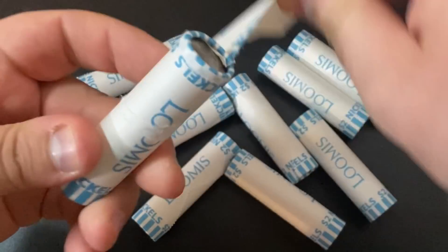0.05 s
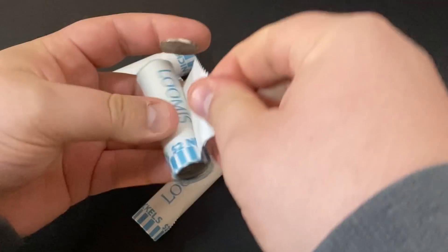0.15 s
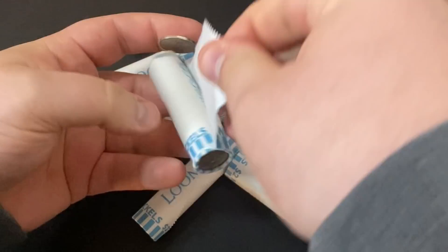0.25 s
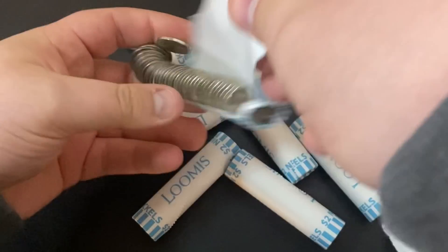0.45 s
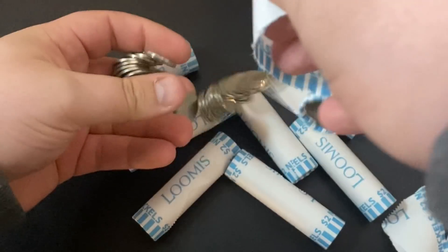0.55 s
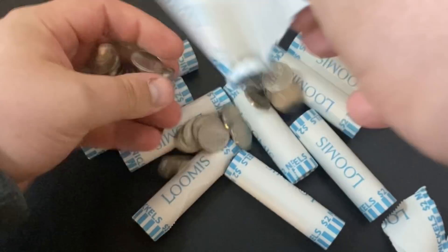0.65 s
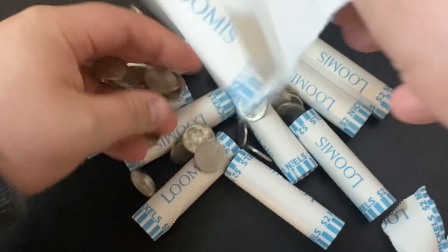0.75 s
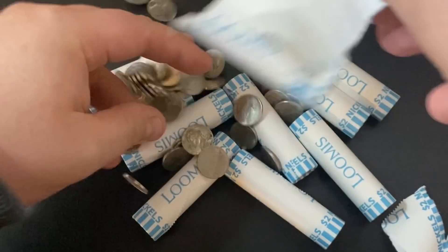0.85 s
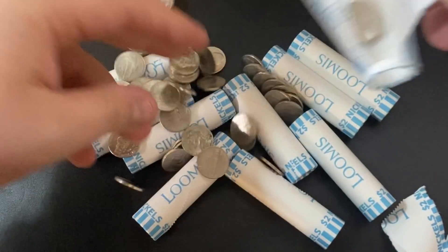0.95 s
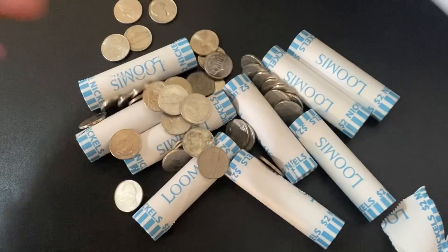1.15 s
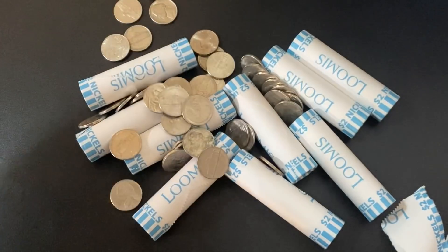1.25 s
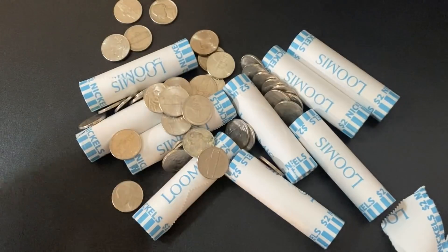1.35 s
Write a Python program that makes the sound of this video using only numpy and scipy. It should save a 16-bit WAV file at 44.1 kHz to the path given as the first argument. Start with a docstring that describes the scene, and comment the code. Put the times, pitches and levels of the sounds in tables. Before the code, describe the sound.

A paper coin roll is torn open and its coins spill onto a hard table. Small snaps lead into a crackling rip from 0.1 to 0.4 s; the wrapper slides and flicks free near 0.5 s. Bright, dense coin chatter and clinks burst out, with hard knocks from 0.64 to 0.75 s, then scattered tumbling and jingling until 1.2 s. Close, small room, faint low hum and handling rumble.

```python
"""Over room air, handling rumble and a wavering low hum that swells later, a paper coin roll is ripped open.
Paper snaps and tears (random ticks, short pitched grains, flap resonances), slides and flicks free (noise).
The coins then chatter, jingle, clink and clack (ticks, decaying sines, noise bursts), and knock, tumble and
rattle on a hard table (damped modes, noise thuds). Paper, coins and table each get a small room's tail."""
import sys
import numpy as np
from scipy import signal
from scipy.fft import rfft, irfft
from scipy.io import wavfile
from scipy.ndimage import map_coordinates

SR = 44100
rng = np.random.default_rng(int(sys.argv[2]) if len(sys.argv) > 2 else 0)


def to_wav(s):
    """Save 16-bit WAV."""
    ch = np.atleast_2d(s).T  # columns
    pcm = np.round(np.clip(ch, -1, 1) * 32767)  # PCM
    wavfile.write(sys.argv[1], SR, pcm.astype(np.int16))


N = 61739


def amp(db):
    """Decibels to gain."""
    return 10 ** (np.asarray(db) / 20)


def unit(x):
    """Scale to rms 1."""
    return x / np.sqrt(np.mean(x ** 2) + 1e-20)


def along(points, hz):
    """Read (Hz, value) points on a log frequency axis."""
    point_hz, value = np.transpose(points)
    return np.interp(np.log(hz + 1), np.log(point_hz + 1), value)


def level(rows):
    """Gain per sample from (s, dB) rows; -120 dB outside, but a last row near the end is held."""
    s, db = np.transpose(rows)
    after_db = db[-1] if s[-1] > N / SR - .1 else -120
    return amp(np.interp(np.arange(N) / SR, s, db, left=-120, right=after_db))


def colour(x, points, tilt_db_per_oct=0, size=2048):
    """Minimum-phase filter of unit energy with the given spectrum and tilt."""
    hz = np.fft.rfftfreq(size, 1 / SR)
    spectrum_db = along(points, hz) + tilt_db_per_oct * np.log2(hz + 100)
    # folding the cepstrum makes the filter causal
    cepstrum = irfft(np.log(amp(spectrum_db)))
    cepstrum[1:size // 2] *= 2
    cepstrum[size // 2 + 1:] = 0
    h = irfft(np.exp(rfft(cepstrum)))
    return signal.fftconvolve(x, h / np.linalg.norm(h))[:len(x)]


def noise(points):
    """Steady noise of rms 1 with the given spectrum."""
    gain = amp(along(points, np.fft.rfftfreq(2 * N, 1 / SR)))
    return unit(irfft(rfft(rng.standard_normal(2 * N)) * gain)[:N])


def fade(t60_s):
    """Exponential decay, cut after a third of a second."""
    return np.exp(-np.log(1000) * np.arange(SR // 3) / SR / t60_s)


def strike(x):
    """Scale a hit to rms 1 over its first 6 ms."""
    return x / np.sqrt(np.mean(x[:SR * 6 // 1000] ** 2))


def burst(points, t60_s, tilt_db_per_oct=0):
    """Decaying white noise, filtered to a spectrum: a short crack."""
    env = fade(t60_s)
    return strike(colour(env * rng.standard_normal(len(env)), points, tilt_db_per_oct))


def ring(modes, t60_s):
    """Damped (Hz, dB) modes, each strike varying their level, sign and tuning."""
    env = fade(t60_s)
    t = np.arange(len(env)) / SR
    out = np.zeros(len(env))
    for hz, db in modes:
        gain = amp(db + 2 * rng.normal()) * rng.choice([-1, 1])
        out += gain * np.sin(2 * np.pi * (hz + 15 * rng.normal()) * t)
    return strike(env * out)


def ticks(per_s, spread_db):
    """Random impulses of uneven size and sign, rms 1."""
    hit = rng.random(N) < per_s / SR
    size = amp(spread_db * np.clip(rng.standard_normal(N), -2, 2))
    return unit(hit * rng.choice([-1, 1], N) * size)


def add(track, s, x):
    """Mix a sound in at a time."""
    part = track[max(0, round(s * SR)):][:len(x)]
    part += x[:len(part)]


# Hum level. Each row: time in seconds, level in dB before the waver.
HUM = [(0, -72), (.14, -64.5), (.45, -78), (.6, -55), (.79, -53), (.86, -49), (1.02, -47), (1.4, -50)]
HUM_HZ, HUM_WAVER_DB, HUM_WAVER_RAD = 53, 2.2, .6


def waver(per_s):
    """Smooth random curve through normal draws at the given rate."""
    return map_coordinates(rng.standard_normal(200), [np.arange(N) / SR * per_s], mode="wrap")


def hum():
    """A low sine whose phase and level wander."""
    phase = 2 * np.pi * HUM_HZ * np.arange(N) / SR + HUM_WAVER_RAD * waver(12)
    return np.sqrt(2) * np.sin(phase) * amp(HUM_WAVER_DB * waver(20)) * level(HUM)


# Handling level. Each row: time in seconds, level in dB.
HANDLING = [(0, -78.5), (.2, -58.5), (.48, -53.5), (.56, -48), (.85, -54.5), (1.3, -67)]
# Handling spectrum. Each row: frequency in Hz, relative level in dB.
HANDLING_COLOUR = [(25, 0.5), (60, 5.5), (120, -5.5), (180, -10.5), (290, -6), (600, -15), (2000, -55)]


def handling():
    """Rumble of the hands: low-frequency noise."""
    return noise(HANDLING_COLOUR) * level(HANDLING)


# Room air spectrum. Each row: frequency in Hz, relative level in dB.
AIR = [(150, -6.5), (300, -27.5), (900, -7.5), (1800, -20.5), (4000, -25), (15000, -29.5)]
AIR_DB = -69.5


def room_air():
    """Still room air: steady noise."""
    return amp(AIR_DB) * noise(AIR)


# Single snaps of the paper. Each row: start in seconds, level in dB, nominal pitch of the sheet in Hz.
SNAPS = [(.003, -61, 1390), (.0695, -63, 1466), (0.094, -49, 1340), (.106, -46.5, 1060),
         (.1385, -44.5, 7200), (0.2477, -43.5, 1393), (.257, -48, 1357), (0.2832, -46.5, 1256)]
# Spectrum of torn paper. Each row: frequency in Hz, relative level in dB.
RIP_COLOUR = [(150, -18), (500, -1), (800, -8), (1350, 1.5), (1700, -13), (3160, -9), (4560, -13.5),
              (7410, -6), (15500, -13.5)]


def snaps():
    """Each snap is a noise crack plus one damped sheet mode."""
    out = np.zeros(N)
    for s, db, hz in SNAPS:
        crack = burst(RIP_COLOUR, t60_s=.041)
        sheet = ring([(hz, 0)], t60_s=.04)
        add(out, s, amp(db) * (crack + amp(-2) * sheet))
    return out


# Pull on the tearing paper. Each row: time in seconds, level in dB.
RIP = [(.091, -87), (.094, -59), (.116, -54), (.14, -43.5), (.162, -51), (.174, -45.5), (.228, -46.5),
       (.248, -46), (.272, -50.5), (.308, -46), (.328, -58), (.38, -54.5), (.41, -78)]
FIBRES_PER_S, FIBRE_SPREAD_DB = 5000, 4.5


def tear():
    """Fibres snap along the tear: dense coloured impulses that follow the pull."""
    return colour(ticks(FIBRES_PER_S, FIBRE_SPREAD_DB) * level(RIP), RIP_COLOUR)


CRACKLE_PER_S, CRACKLE_BAND_HZ, CRACKLE_DB = 1000, (1200, 13000), -2
CRACKLE_CYCLES = 3.5  # cycles to decay to 1/e


def crackle():
    """Larger fibre bundles part along the tear, each a damped sine of its own pitch."""
    out, pull = np.zeros(N), level(RIP)
    t = np.arange(SR // 100) / SR
    lo_hz, hi_hz = CRACKLE_BAND_HZ
    for when, pitch, size in rng.random((CRACKLE_PER_S * N // SR, 3)):
        hz = lo_hz * (hi_hz / lo_hz) ** np.sqrt(pitch)
        grain = np.sin(2 * np.pi * hz * t) * np.exp(-hz * t / CRACKLE_CYCLES)
        add(out, when * N / SR, pull[int(when * N)] * 2 * size * grain)
    return amp(CRACKLE_DB) * out


# Resonances of the loose flap, shifting as it grows.
# Each row: start in seconds, length in seconds, frequency in Hz, peak level in dB over the pull.
FLAP = [(0.137, 0.083, 7250, -6.5), (0.161, 0.051, 3050, -9.5), (0.204, .12, 5340, -7.5),
        (0.229, 0.088, 1300, -6.5)]
FLAP_WIDTH_HZ = 220


def flap():
    """Fibre ticks excite narrow resonances of the flap, each swelling and fading as a half sine."""
    out, t = np.zeros(N), np.arange(N) / SR
    for s, length_s, hz, db in FLAP:
        b, a = signal.iirpeak(hz, hz / FLAP_WIDTH_HZ, SR)
        band = unit(signal.lfilter(b, a, ticks(FIBRES_PER_S, FIBRE_SPREAD_DB)))
        swell = np.sin(np.pi * np.clip((t - s) / length_s, 0, 1))
        out += amp(db) * band * swell
    return out * level(RIP)


# Wrapper sliding off the coins. Each row: time in seconds, level in dB.
SLIDE = [(.37, -69.5), (.405, -43.5), (.44, -44), (.475, -46), (.503, -58), (.53, -102)]
# Slide spectrum. Each row: frequency in Hz, relative level in dB.
SLIDE_COLOUR = [(150, 0), (800, -8.5), (1450, 1), (2310, -10), (3410, 4.5), (4000, -6.5), (4600, -1),
                (7700, 1.5), (15500, -11)]


def slide():
    """The wrapper rubs over the coins: dense coloured impulses."""
    return colour(ticks(per_s=7600, spread_db=4) * level(SLIDE), SLIDE_COLOUR)


# Wrapper flicking free. Each row: start in seconds, level in dB.
FLICKS = [(0.5082, -33), (0.513, -41.5), (0.519, -39.5)]
# Flick spectrum. Each row: frequency in Hz, relative level in dB.
FLICK_COLOUR = [(80, -16), (220, 5), (446, 9), (1040, -2), (1450, 8.5), (1820, -11), (2860, 0.5),
                (4000, -16.5), (9000, -11.5), (14000, -13)]


def flicks():
    """The wrapper flicks free in short noise cracks."""
    out = np.zeros(N)
    for s, db in FLICKS:
        add(out, s, amp(db) * burst(FLICK_COLOUR, t60_s=.052))
    return out


COIN_BAND_HZ = (11200, 15400)


def coin_contacts(rows, per_s, t60_s):
    """Many light contacts, each a decaying sine: one coin rings at its own pitch."""
    out, env = np.zeros(N), fade(t60_s)[:SR // 8]
    t = np.arange(len(env)) / SR
    # holds the overall level whatever the rate and decay
    strength = level(rows) * np.sqrt(2 * SR / per_s / np.sum(env ** 2))
    for k, (late, pitch, phase, size) in enumerate(rng.random((per_s * N // SR, 4))):
        s = (k + late) / per_s
        if rows[0][0] < s < rows[-1][0]:
            hz = np.interp(pitch, [0, 1], COIN_BAND_HZ)
            ping = env * np.sin(2 * np.pi * (hz * t + phase))
            add(out, s, strength[int(s * SR)] * 2 * size ** 2 * ping)
    return out


# Coins rubbing as the stack fans out. Each row: time in seconds, level in dB before the layer gains below.
CHATTER = [(.465, -54), (.487, -39), (.504, -46), (.54, -27), (.565, -32.5), (.587, -39.5), (.61, -31.5),
           (.65, -49.5), (.672, -33.5), (.70, -42), (.798, -45.5), (.815, -33), (.845, -43.5), (.92, -43.5),
           (.96, -46.5), (1.03, -45), (1.065, -44), (1.15, -46), (1.205, -51), (1.24, -108)]
# Chatter spectrum. Each row: frequency in Hz, relative level in dB.
CHATTER_COLOUR = [(1200, -16.5), (2200, -14), (5600, -13), (7000, -4), (10200, -5), (11500, 0.5),
                  (15000, 0.5)]
CHATTER_PER_S, CHATTER_SPREAD_DB, CHATTER_DB = 4000, 2, -1.5
PING_PER_S, PING_T60_S, PING_DB = 1800, .035, -6


def chatter():
    """Packed coins chatter: coloured impulses with heavily damped pings."""
    rub = colour(ticks(CHATTER_PER_S, CHATTER_SPREAD_DB) * level(CHATTER), CHATTER_COLOUR)
    pings = coin_contacts(CHATTER, PING_PER_S, PING_T60_S)
    return amp(CHATTER_DB) * rub + amp(PING_DB) * pings


# Loose coins jostling. Each row: time in seconds, level in dB.
JINGLE = [(.5, -65), (.56, -41), (.66, -34), (.78, -61), (.925, -50), (1.0, -67), (1.07, -40), (1.19, -64)]


def jingle():
    """Loose coins touch less often and ring longer than packed ones."""
    return coin_contacts(JINGLE, per_s=300, t60_s=.12)


# Coin-on-coin clinks. Each row: start in seconds, level in dB before tick and ring gains, nominal pitch in Hz.
CLINKS = [(.5358, -35, 13700), (0.5596, -29, 11650), (.571, -33, 15050), (0.607, -30, 14570),
          (0.633, -34.5, 11300), (0.66, -34, 14790), (.712, -41, 12125), (.759, -42, 14750),
          (0.8122, -36, 14970), (0.865, -39, 13400), (.875, -41, 12130), (.918, -35.5, 14330),
          (.986, -41, 12540), (1.011, -39, 14190), (1.053, -33.5, 14900), (1.065, -35.5, 14980),
          (1.071, -40, 11680), (1.111, -35.5, 13680), (1.158, -43, 13690)]
CLINK_TICK_DB, CLINK_TICK_T60_S = -4, .02
CLINK_RING_DB, CLINK_RING_T60_S, CLINK_ATTACK_S = -4.5, .18, .003


def clinks():
    """A contact tick, then a close pair of coin modes that swells in and decays."""
    out = np.zeros(N)
    swell = 1 - np.exp(-np.arange(SR // 3) / SR / CLINK_ATTACK_S)
    for s, db, hz in CLINKS:
        tick = burst(CHATTER_COLOUR, CLINK_TICK_T60_S)
        pair = swell * ring([(hz, 0), (hz + 70, -13)], CLINK_RING_T60_S)
        add(out, s, amp(db) * (amp(CLINK_TICK_DB) * tick + amp(CLINK_RING_DB) * pair))
    return out


# Dry clacks of a coin's edge. Each row: start in seconds, level in dB, centre of the band in Hz.
CLACKS = [(.6332, -41, 7640), (0.711, -50, 4600), (0.7413, -35.5, 6100), (.8105, -39.5, 7960),
          (1.009, -52, 5700), (1.292, -70.5, 6500)]


def clacks():
    """A coin's edge gives a short noise burst in a band around its pitch."""
    out = np.zeros(N)
    for s, db, hz in CLACKS:
        edge = [(hz / 3, -22), (hz * .75, -11), (hz * .9, 0), (hz * 1.1, 0), (hz * 1.25, -16), (hz * 3, -32)]
        add(out, s, amp(db) * burst(edge, t60_s=.016))
    return out


# Blows on the table.
# Each row: start in seconds, level in dB before part gains, thud tilt in dB per octave, contact pitch in Hz.
KNOCKS = [(0.6367, -28, -1, 877), (0.6398, -31.5, 0, 1250), (.649, -29, 1, 1140), (.686, -37, -8, 920),
          (.711, -46, 3, 1300), (0.7415, -28.5, -1, 1067), (.749, -44, -1.5, 1020), (.775, -46, -1.5, 1230),
          (.846, -41.5, 6, 1120), (.897, -46.5, 1, 1100), (.92, -47, -6, 826), (0.952, -43, 7, 1060),
          (1.006, -40.5, -2, 906), (1.045, -39.5, 8.5, 1350), (1.058, -34, 1, 1004),
          (1.103, -41, -1.5, 1036), (1.131, -44.5, 0.5, 1310)]
# Modes of the tabletop. Each row: nominal frequency in Hz, relative level in dB.
TABLE = [(285, 5), (450, 9.5), (725, 0), (935, 11.5), (1095, -1), (1265, 6), (1385, -13), (1600, 1.5)]
# Thud spectrum. Each row: frequency in Hz, relative level in dB.
THUD_COLOUR = [(100, -23.5), (180, -24), (260, -2), (500, 1), (950, 4.5), (1350, 6.5), (1800, -14),
               (2400, -13), (3500, -29), (8000, -44)]
CONTACT_T60_S, CONTACT_DB = .024, -4
THUD_T60_S, THUD_DB = .039, -1
TABLE_T60_S, TABLE_RING_DB = .094, -9
REBOUND_S, REBOUND_DB = (.006, .026), -12


def knocks():
    """Each falling coin or clump sounds a pitched contact, a thud and the tabletop's modes, then rebounds."""
    out, env = np.zeros(N), fade(CONTACT_T60_S)
    t = np.arange(len(env)) / SR
    for s, db, tilt, hz in KNOCKS:
        contact = amp(CONTACT_DB) * strike(env * np.sin(2 * np.pi * hz * t))
        thud = amp(THUD_DB) * burst(THUD_COLOUR, THUD_T60_S, tilt)
        tabletop = amp(TABLE_RING_DB) * ring(TABLE, TABLE_T60_S)
        add(out, s, amp(db) * (contact + thud + tabletop))
        rebound = burst(THUD_COLOUR, THUD_T60_S, tilt + 3)
        add(out, s + rng.uniform(*REBOUND_S), amp(db + REBOUND_DB) * rebound)
    return out


# Small coins tumbling between the blows. Each row: time in seconds, level in dB.
TUMBLE = [(.64, -45.5), (.72, -47.5), (.82, -60), (.9, -53.5), (1.0, -61), (1.08, -47), (1.14, -52.5),
          (1.19, -66)]


def tumble():
    """Small coins tumble on the table: sparse impulses with the thud's spectrum."""
    return colour(ticks(per_s=400, spread_db=4.5) * level(TUMBLE), THUD_COLOUR)


# Coins landing flat. Each row: start in seconds, level in dB, decay T60 in seconds.
RATTLES = [(.742, -41, 0.092), (.846, -52, 0.053), (1.052, -42.5, 0.094)]
# Rattle spectrum. Each row: frequency in Hz, relative level in dB.
RATTLE_COLOUR = [(500, -43), (1600, 0.5), (2150, -1.5), (3400, -19.5), (6000, -19.5)]


def rattles():
    """Coins landing flat rattle briefly: decaying noise bursts."""
    out = np.zeros(N)
    for s, db, t60_s in RATTLES:
        add(out, s, amp(db) * burst(RATTLE_COLOUR, t60_s))
    return out


# Decay of the room. Each row: frequency in Hz, T60 in seconds.
ROOM_T60 = [(200, 0.48), (1000, 0.39), (5000, 0.42), (14000, 0.087)]
PAPER_WET_DB, COIN_WET_DB, TABLE_WET_DB = -12, -12.5, -8.5


def room(x, wet_db):
    """The sound plus a tail of decaying noise, 5 ms late, whose top treble dies first."""
    hz, t, z = signal.stft(rng.standard_normal(SR // 2), SR, nperseg=256)
    decay = np.exp(-np.log(1000) * t / along(ROOM_T60, hz)[:, None])
    tail = signal.istft(z * decay, SR, nperseg=256)[1]
    tail = np.pad(tail / np.linalg.norm(tail), (SR // 200, 0))
    return x + amp(wet_db) * signal.fftconvolve(x, tail)[:N]


def scene():
    """Background, then paper, coins and table in the room."""
    background = hum() + handling() + room_air()
    paper = snaps() + tear() + crackle() + flap() + slide() + flicks()
    coins = chatter() + jingle() + clinks() + clacks()
    table = knocks() + tumble() + rattles()
    wet = room(paper, PAPER_WET_DB) + room(coins, COIN_WET_DB) + room(table, TABLE_WET_DB)
    return (background + wet)[None]


TOP_HZ = 15600


def record(dry):
    """A very steep zero-phase low-pass ends the treble at the band limit."""
    hz = np.fft.rfftfreq(2 * N, 1 / SR)
    return irfft(rfft(dry, 2 * N) / np.sqrt(1 + (hz / TOP_HZ) ** 160))[:, :N]


dry = scene()
out = record(dry)
to_wav(out)
```